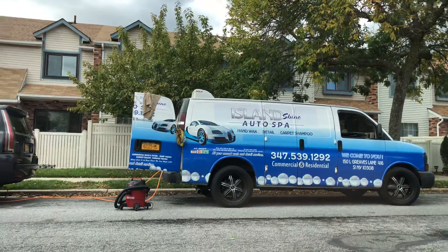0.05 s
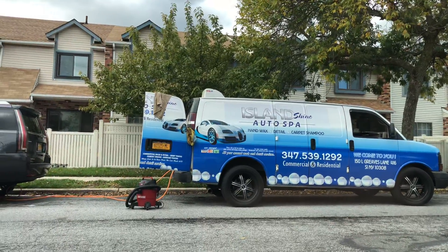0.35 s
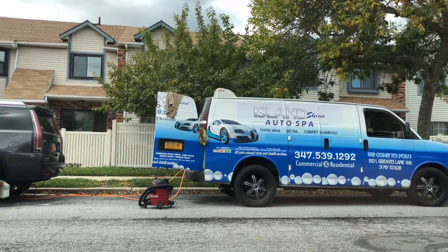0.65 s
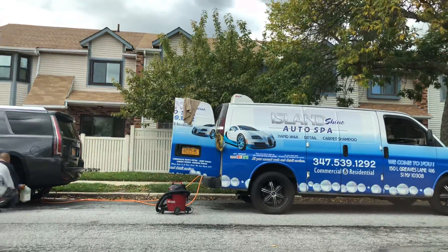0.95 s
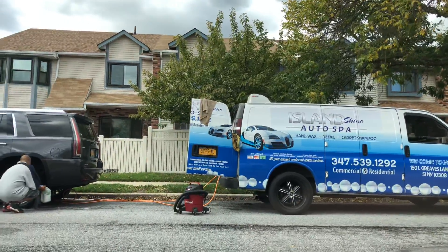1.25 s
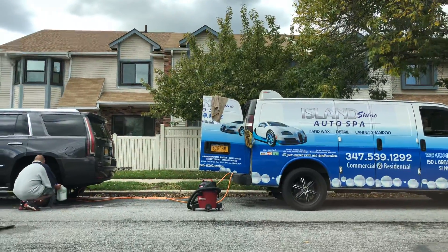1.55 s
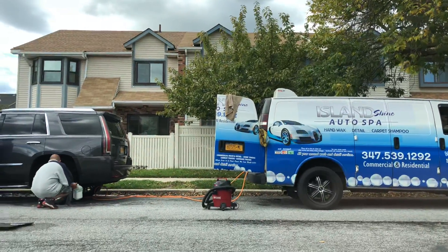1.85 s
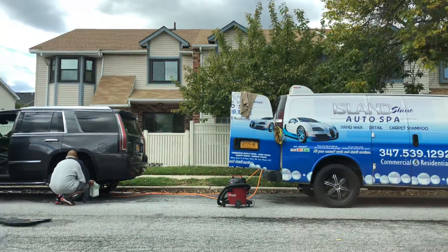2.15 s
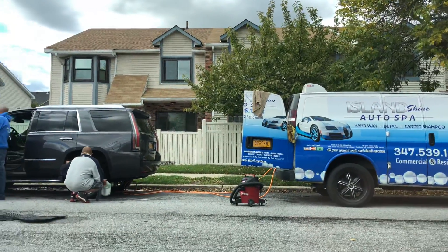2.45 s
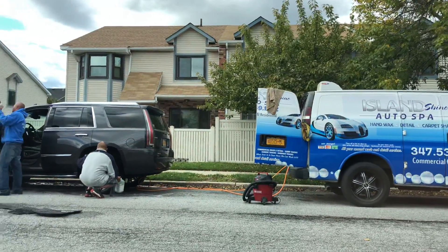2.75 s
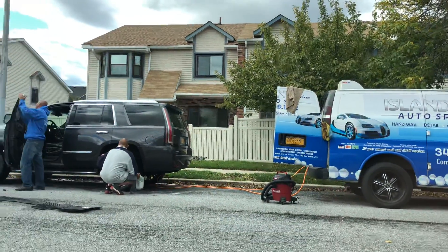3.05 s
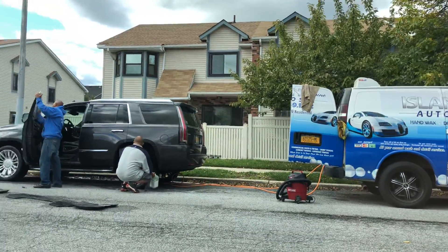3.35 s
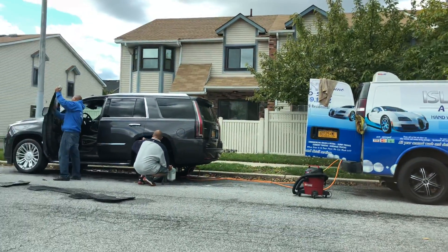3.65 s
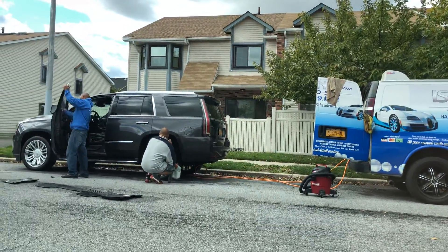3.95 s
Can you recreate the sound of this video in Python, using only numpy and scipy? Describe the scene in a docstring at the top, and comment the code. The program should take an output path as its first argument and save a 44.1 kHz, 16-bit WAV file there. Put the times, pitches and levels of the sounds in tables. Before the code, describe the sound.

A small engine rumbles low and evenly, with a wavering hum and soft fan noise, picked up across a quiet street. Light ticks and brief, faint spraying or wiping hisses come from a car being cleaned, more often toward the end.

```python
"""A quiet residential street: across it, a small engine runs steadily in a car-wash van.
Its firings throb through the muffler while a second hum wavers beside them. The casing
rumbles, the cooling fan roars, and fan and gears whine faintly. Someone cleaning a car
makes a few light taps and short, soft hisses over a bed of distant street and leaves."""
import sys
import numpy as np
from scipy import signal
from scipy.fft import rfft, irfft
from scipy.io import wavfile
from scipy.ndimage import uniform_filter1d

SR = 44100
rng = np.random.default_rng(int(sys.argv[2]) if len(sys.argv) > 2 else 0)


def unload_audio(sound):
    """Save the sound as a 16-bit wav file, at the path given as the first command line argument."""
    columns = np.transpose(np.atleast_2d(sound))
    # keep every value between -1 and 1, then stretch to whole-number steps
    steps = np.round(np.clip(columns, -1, 1) * 32767)
    wavfile.write(sys.argv[1], SR, steps.astype(np.int16))


N = 176400
FIRING_HZ, FIRST_FIRING_S = 20.39, .02


def undb(db):
    """Decibels to gain."""
    return 10 ** (np.asarray(db) / 20)


def level(x, db):
    """Scale to an rms level."""
    return x * undb(db) / np.sqrt(np.mean(x ** 2))


def colour(x, points):
    """Causal filter through (Hz, dB) points."""
    hz, db = np.array(points, float).T
    size = 2 * len(x)
    f = np.maximum(np.fft.rfftfreq(size, 1 / SR), 1)
    cepstrum = irfft(np.log(undb(np.interp(np.log(f), np.log(hz), db))))
    cepstrum[1:size // 2] *= 2
    cepstrum[size // 2 + 1:] = 0
    return irfft(rfft(x, size) * np.exp(rfft(cepstrum)))[:len(x)]


def noise(points):
    """Noise of rms 1 with the given spectrum."""
    return level(colour(rng.standard_normal(N + SR), points)[SR:], 0)


def band(hz, width_hz):
    """Noise of rms 1 in one steep resonance."""
    f = np.maximum(np.fft.rfftfreq(N, 1 / SR), 1)
    return level(irfft(rfft(rng.standard_normal(N)) / (1 + ((f - hz * hz / f) / width_hz) ** 2), N), 0)


def walk(rate):
    """Slow random motion with a spread near 1."""
    k = max(int(SR / rate), 1)
    held = rng.standard_normal(N)[np.arange(N) // k]
    return level(uniform_filter1d(uniform_filter1d(held, k), k), 0)


def tone(hz):
    """A sine of rms 1 that follows a pitch curve."""
    return np.sqrt(2) * np.sin(2 * np.pi * np.cumsum(hz) / SR)


def exhaust():
    """Each firing sends one slightly uneven pressure pulse ringing through the muffler."""
    # Muffler response: frequency_hz, gain_db
    muffler = [(20, -19.5), (41, -6.5), (61, 3), (82, 2), (102, -10), (122, 0.5), (143, -24.5), (163, -1.5),
               (184, -15.5), (204, -14.5), (224, -30), (245, -9.5), (275, -25.5), (330, -24), (420, -38),
               (800, -70.5)]
    jitter_s, scatter_db = .00012, .5
    firings = np.arange(-int(FIRING_HZ), int(FIRING_HZ * N / SR) + 1)
    timing, strength = rng.standard_normal((len(firings), 2)).T
    firing_s = FIRST_FIRING_S + firings / FIRING_HZ + jitter_s * timing
    onsets = (firing_s * SR).astype(int) + SR  # a second of pre-roll: the muffler already rings
    pulses = np.zeros(N + 2 * SR)
    pulses[np.maximum(onsets, 0)] = undb(scatter_db * strength)
    throb = colour(pulses - pulses.mean(), muffler)[SR:SR + N]
    return level(throb, db=-45)


def second_hum(t):
    """A low hum drifts in pitch and beats against the engine."""
    # Drift of the hum: time_s, pitch_hz
    drift = [(0, 100.9), (.9, 100.8), (1.25, 100.1), (2.05, 102.0), (2.6, 100.9), (3.15, 100.1),
             (3.55, 102.1), (4, 101.8)]
    pitch_hz = np.interp(t, *np.array(drift).T)
    return undb(-45 + .5 * walk(7.3)) * tone(pitch_hz)


def casing_and_fan(t):
    """Casing rumble and cooling air swell with each firing."""
    # Rumble of the engine casing: frequency_hz, density_db
    rumble_spectrum = [(20, -47), (30, -27), (38, -9.5), (48, 0), (70, -0.5), (110, -3), (140, -1.5),
                       (175, 3), (220, -5.5), (265, -2), (310, -4.5), (370, -8.5), (400, -14.5), (480, -20),
                       (900, -59.5)]
    # Roar of the cooling air: frequency_hz, density_db
    air_spectrum = [(150, -8), (420, -10), (490, -7), (610, -2), (680, 1.5), (750, -1.5), (830, -6.5),
                    (950, -7), (1040, -13.5), (1150, -14), (1270, -19), (1420, -17.5), (1650, -22),
                    (1950, -25.5), (2130, -21), (2400, -28.5), (3000, -30), (3600, -27.5), (4500, -33.5),
                    (8000, -63)]
    swell = np.sin(2 * np.pi * FIRING_HZ * (t - FIRST_FIRING_S))
    rumble = noise(rumble_spectrum) * (1 + .12 * swell)
    air = noise(air_spectrum) * (1 + .061 * swell) * undb(.5 * walk(6))
    return level(rumble, db=-48) + level(air, db=-57.5)


def whines():
    """Fan and gears sing thin tones that waver in level and pitch."""
    # Fan and gear tones: pitch_hz, level_db
    partials = [(569, -71.5), (978, -82), (1174, -83)]
    out = np.zeros(N)
    for pitch_hz, level_db in partials:
        gain = undb(level_db + 1.7 * walk(7))
        out += gain * tone(pitch_hz * (1 + .00195 * walk(12)))
    return out


def taps(t):
    """Light contacts on the car: bright ticks of noise that die in milliseconds."""
    # Taps and scuffs: start_s, level_db, ring_hz, width_hz, decay_s
    contacts = [(.681, -68, 5000, 18000, .013), (1.325, -60, 2600, 3980, 0.0058),
                (1.916, -65.5, 2800, 4470, 0.016), (2.509, -73, 5430, 3000, .003),
                (2.599, -75, 5600, 2500, 0.0036), (2.649, -72, 5600, 3000, 0.0045),
                (3.089, -57, 3400, 3600, 0.0032), (3.3995, -64.5, 5500, 2000, .004),
                (3.448, -64, 5000, 3500, 0.0036)]
    attack_s = .00097
    out = np.zeros(N)
    for start_s, level_db, ring_hz, width_hz, decay_s in contacts:
        age = np.maximum(t - start_s, 0)
        envelope = np.minimum(age / attack_s, 1) * np.exp(-age / decay_s)
        out += undb(level_db) * envelope * band(ring_hz, width_hz)
    return out


def hisses(t):
    """Spraying and wiping make gritty, fluttering hisses, each with one bright resonance."""
    # Sprays and wipes: start_s, length_s, level_db, resonance_hz, broad_relative_db
    strokes = [(1.731, 0.16, -82, 6000, 2), (2.835, .025, -75.5, 5700, -4), (2.88, .025, -79.5, 5700, 0),
               (2.932, .025, -77, 5600, -2), (3.087, 0.25, -80, 5400, 1), (3.187, 0.021, -72, 5440, -10),
               (3.285, 0.027, -79, 5500, -5), (3.463, 0.064, -78, 5400, 1), (3.63, .09, -84, 5300, -4)]
    # Broad part of the hiss: frequency_hz, density_db
    spray_spectrum = [(1000, -16), (3300, 11), (6500, -17.5), (7500, 6), (8700, 1), (9700, 3), (11000, -5),
                      (15500, 1)]
    fade_s, flutter_db, grit_db = .013, 2, .5
    spray = noise(spray_spectrum)
    out = np.zeros(N)
    for start_s, length_s, level_db, resonance_hz, broad_relative_db in strokes:
        end_s = start_s + length_s + fade_s
        gate = np.clip(np.minimum(t - start_s, end_s - t) / fade_s, 0, 1)
        hiss = band(resonance_hz, width_hz=1250) + undb(broad_relative_db) * spray
        out += undb(level_db) * gate * hiss
    texture = undb(flutter_db * walk(90) + grit_db * walk(600))
    return out * level(texture, db=0)


def street():
    """Distant street and leaves blend into a soft, slowly breathing bed."""
    # Street and leaves: frequency_hz, density_db
    bed_spectrum = [(100, 15), (1000, 18.5), (2500, 7), (4000, 2.5), (5300, 5), (6500, 3), (9000, 0.5),
                    (12000, -1), (15500, -1.5)]
    return undb(-71 + .71 * walk(1.1)) * noise(bed_spectrum)


def scene():
    """The van, the cleaning and the street at one microphone."""
    t = np.arange(N) / SR
    van = exhaust() + second_hum(t) + casing_and_fan(t) + whines()
    cleaning = taps(t) + hisses(t)
    return (van + cleaning + street())[None]


def record(dry):
    """The recorder cuts the deepest bass and the very top."""
    low_cut_hz, high_cut_hz = 27.7, 15750
    low_cut = signal.butter(4, low_cut_hz, "highpass", fs=SR, output="sos")
    high_cut = signal.ellip(10, .2, 70, high_cut_hz, fs=SR, output="sos")
    return signal.sosfilt(high_cut, signal.sosfilt(low_cut, dry))


dry = scene()
out = record(dry)
unload_audio(out)
```